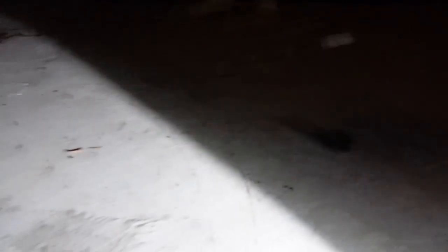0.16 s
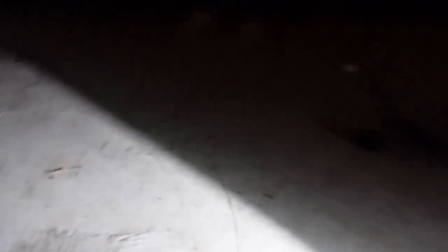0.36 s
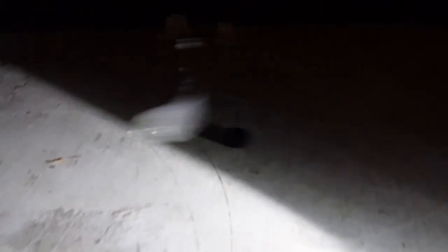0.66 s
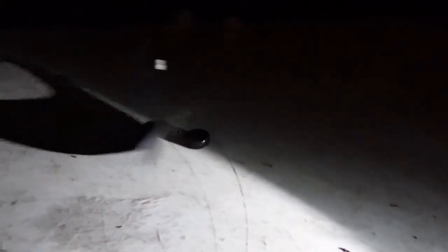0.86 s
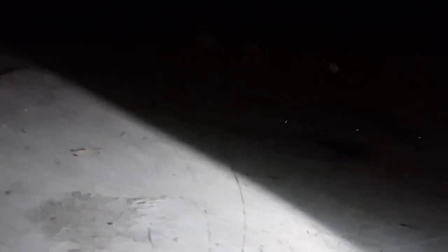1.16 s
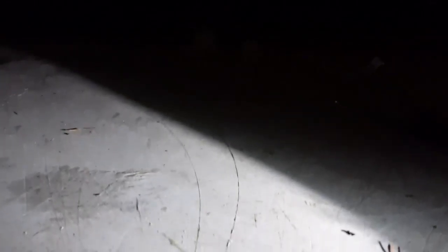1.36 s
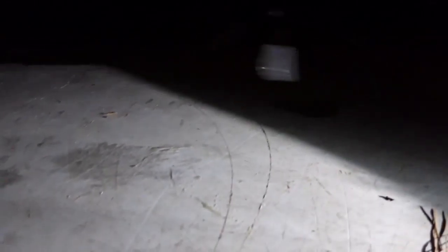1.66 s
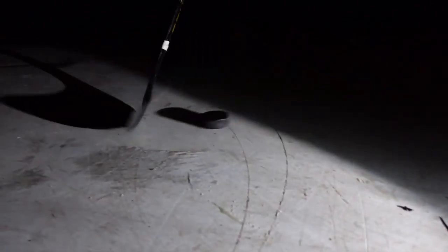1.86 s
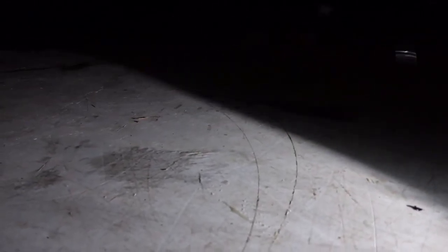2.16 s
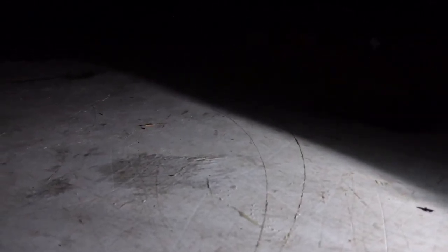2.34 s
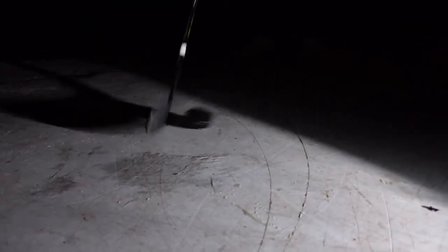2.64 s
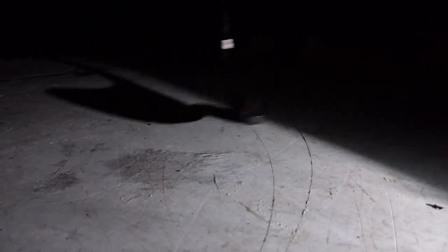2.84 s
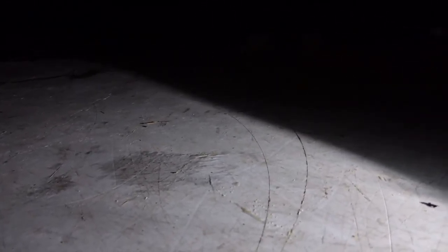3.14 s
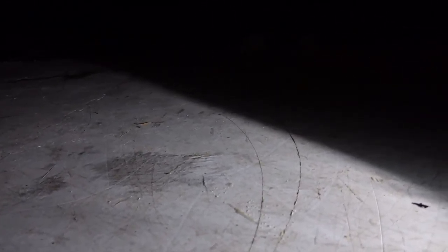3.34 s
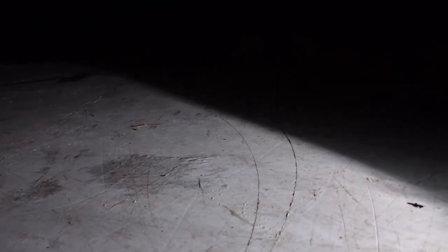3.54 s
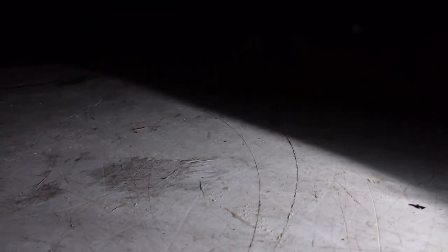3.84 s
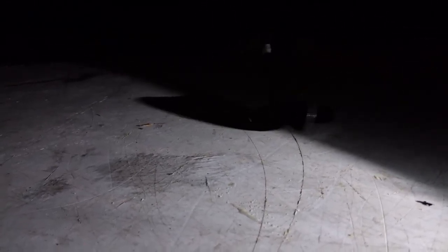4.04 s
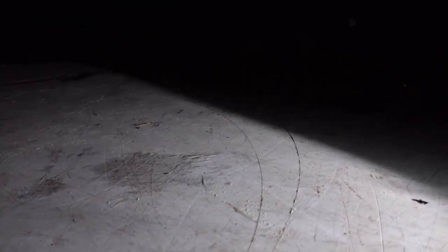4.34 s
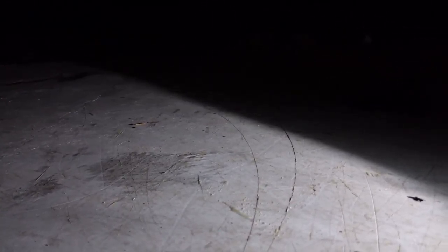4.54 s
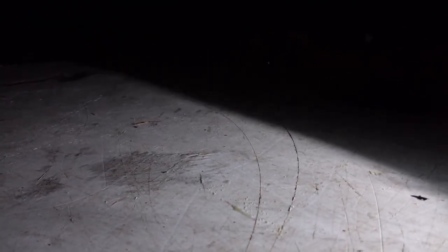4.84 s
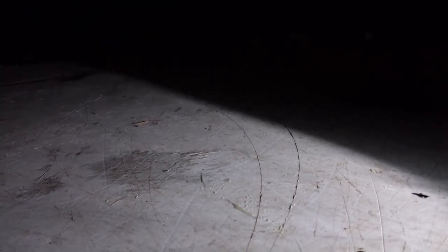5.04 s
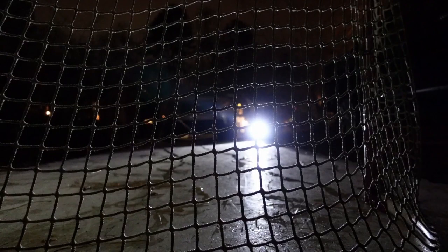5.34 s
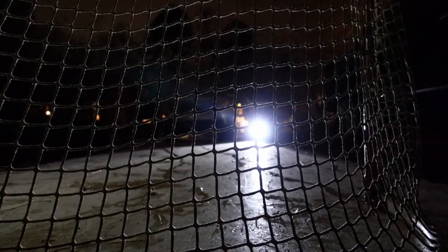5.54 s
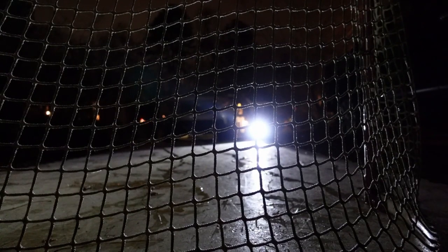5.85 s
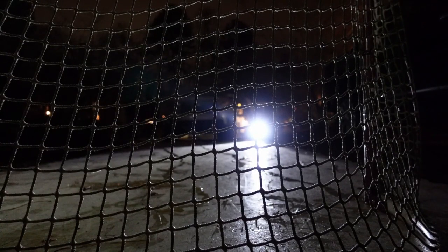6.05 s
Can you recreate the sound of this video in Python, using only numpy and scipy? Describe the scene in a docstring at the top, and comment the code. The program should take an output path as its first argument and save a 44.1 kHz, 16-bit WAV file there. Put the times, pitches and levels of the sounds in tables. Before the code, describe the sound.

A hockey stick batters a hard puck across a gritty slab, loud and dry, then rough handling bumps and quiet far-off taps behind a net.

```python
"""Stick and puck on a concrete slab at night

An outdoor slab, with the microphone almost touching a hockey stick that handles a puck.
Knocks and cracks are damped modes, scrapes are filtered grains, judder and rasp are stick-slip pulses.
Low thumps come from blade blows and, near the end, from rubs on the camera's housing; peaks overload.
Then the play is far off, behind the goal net: taps with weak echoes and a slide over the night hush."""
import sys
import numpy as np
from scipy import signal
from scipy.fft import rfft, irfft, next_fast_len
from scipy.io import wavfile
from scipy.ndimage import uniform_filter1d, map_coordinates

SR = 44100
rng = np.random.default_rng(int(sys.argv[2]) if len(sys.argv) > 2 else 0)


def unload_wav(signal):
    """Save mono or channel-first audio to the path in sys.argv[1] as 16-bit WAV at rate SR, clipped to [-1, 1]."""
    wavfile.write(
        sys.argv[1],
        SR,
        np.round(np.clip(np.atleast_2d(signal).T, -1, 1) * 32767).astype(np.int16),
    )


N = 273419

# Far play behind the net. Each row: start in seconds, level in dB, pitch in Hz.
FAR_TAPS = [(5.5162, -27, 1000), (5.7674, -23, 476), (6.096, -24.5, 916)]
# Swell of the far slide. Each row: time in seconds, level in dB.
FAR_LEVEL = [(5.8, -55.5), (5.92, -44.5), (6.0, -48), (6.09, -29), (6.2, -51)]
# Spectra of the far slide and the night hush. Each row: frequency in Hz, relative level in dB.
FAR_SLIDE = [(25, -0.5), (490, -5.5), (2500, -6), (7000, -34.5), (16000, -45)]
NIGHT = [(25, 5), (280, -13.5), (476, -8), (800, -13), (16000, -35)]

# Rubs on the camera housing. Each row: start in seconds, length in seconds, shell level in dB,
# dulling corner in Hz, grit level in dB.
GRINDS = [(4.584, 0.048, -7.5, 13000, -26.5), (4.651, 0.034, -11, 9000, -44),
          (4.729, 0.047, -10, 5000, -47), (4.776, 0.03, -13.5, 4470, -44),
          (5.044, 0.068, -19.5, 450, -51.5), (5.176, 0.054, -10.5, 2630, -33.5)]
# Knocks of the shell where a rub catches. Each row: start in seconds, peak level in dB.
BUMPS = [(4.5871, 7), (4.643, -4), (4.665, -5.5), (4.709, -1.5), (4.7253, 0), (4.7462, -2), (4.7963, -10),
         (5.095, -17), (5.1745, -5.5)]
# Spectrum of the shell. Each row: frequency in Hz, relative level in dB.
GRIND = [(40, -3), (110, 14), (300, 7), (520, 6), (1100, -2.5), (1450, -9), (1780, 4), (2120, -2.5),
         (2420, -0.5), (3100, -18), (7500, -46.5)]
RUB_RISE_S = 0.00064  # swell of a rub at 0 dB; lighter rubs swell more slowly
SHELL_T60_S = 0.023  # decay of the scattered paths before their spectrum is flattened

# The puck rolls on its edge. Each row: start in seconds, length in seconds, level in dB.
ROLL = [(1.61, 0.38, -49), (2.87, 0.23, -30.5), (3.64, 0.22, -46), (3.93, 0.4, -43)]
# Pushes that send the puck sliding. Each row: start in seconds, length in seconds,
# grit level in dB, tumble level in dB, both ahead of the trims in the slide.
SLIDES = [(0, 0.024, -19.5, -10.5), (0.099, 0.058, -21.5, -16.5), (0.232, 0.29, -34, -27),
          (0.371, 0.12, -23.5, -16.5), (0.614, 0.065, -23.5, -21), (0.721, 0.22, -28.5, -17.5),
          (0.916, 0.067, -21.5, -19.5), (1.042, 0.34, -30.5, -23.5), (1.448, 0.064, -21.5, -18.5),
          (1.594, 0.38, -39.5, -36), (1.943, 0.2, -25.5, -23), (2.304, 0.032, -21.5, -22.5),
          (2.503, 0.24, -23, -16), (2.808, 0.19, -34.5, -21.5), (3.062, 0.15, -30.5, -18),
          (3.257, 0.26, -35, -20.5), (3.635, 0.21, -40, -23.5), (4.029, 0.13, -29, -20),
          (4.193, 0.044, -31.5, -15), (4.315, 0.045, -40.5, -42.5), (4.493, 0.087, -34, -22),
          (4.855, 0.052, -46.5, -33.5)]
# Spectra of grit, tumble and camera rumble. Each row: frequency in Hz, relative level in dB.
GRIT = [(400, -18), (1100, 7.5), (2200, 7), (2900, 4.5), (3800, -2.5), (6500, -13), (16000, -46.5)]
TUMBLE = [(70, -3.5), (160, -1.5), (380, -3), (700, -9), (1300, -17), (3000, -59)]
RUMBLE = [(12, 9.5), (45, 2.5), (90, 2), (160, -9.5), (400, -76.5)]
SLIDE_RISE_S, SLIDE_FALL_DB_PER_S = 0.0019, 176.5  # it slides evenly, then runs out
WAKE_DB, WAKE_FALL_DB_PER_S = -15.5, 96.5  # rumble left by each thump, against that thump
SHAKE_DB = -4  # rumble against the tumble envelope
# Chance ticks of the puck against the blade. Each list: the value over grit, then over tumble;
# first the level in dB against the slide, then the middle pitch in Hz.
RATTLE_DB = [1.5, -3.5]
RATTLE_HZ = [2230, 491]
RATTLE_PER_S = 45  # in each of the two bands
RATTLE_SPREAD_DB, RATTLE_SPREAD_OCTAVES = 11, 0.72  # scatter either way

# The flat blade sweeps the slab. Each row: start in seconds, length in seconds, level in dB.
SWEEPS = [(1.45, 0.14, -24.5), (1.945, 0.24, -18), (2.53, 0.11, -25.5), (5.53, 0.045, -45)]
# Spectrum of a sweep. Each row: frequency in Hz, relative level in dB.
SWEEP = [(400, -33), (1200, -2), (2000, 2), (3000, -4), (6600, -12), (16000, -43)]
# The blade edge rasps. Each row: start in seconds, length in seconds, level in dB,
# first pitch in Hz, last pitch in Hz.
RASPS = [(2.515, 0.063, -14.5, 1630, 1730), (2.559, 0.027, -13, 1470, 1090), (2.589, 0.17, -23, 1270, 1280),
         (2.651, 0.026, -18, 1260, 1190), (3.23, 0.054, -16.5, 1560, 1670), (3.305, 0.21, -20, 1480, 1390)]

# The blade judders, stiffly and softly. Each row: start in seconds, length in seconds, level in dB.
JUDDER = [(3.292, 0.17, -18.5), (3.486, 0.08, -21.5)]
SOFT_JUDDER = [(3.666, 0.14, -16.5)]
# The judder's hardest catches on the concrete. Each row: time in seconds, peak level in dB.
SLIPS = [(3.204, 4), (3.298, 4), (3.3075, 2.5), (3.318, 8), (3.331, -4), (3.344, 0), (3.362, 5.5),
         (3.379, -0.5), (3.3909, 2.5), (3.395, 6), (3.422, 5), (3.4355, 1), (3.4406, 3.5), (3.462, 11),
         (3.486, 6.5), (3.494, 4.5), (3.5101, 2), (3.5167, 3), (3.528, -6.5), (3.551, -0.5), (3.566, 6),
         (3.67, -11), (3.6901, -5), (3.7525, -10), (3.758, -2.5), (3.7695, -3.5), (3.789, -8.5),
         (3.8252, -7)]
# Resonances of the dragged stick, stiff and soft. Each row: middle pitch in Hz, width in Hz, gain in dB.
STIFF = [(510, 91, 15), (880, 170, -1.5), (1396, 64, 13.5), (2110, 200, 7.5)]
SOFT = [(350, 166, 23), (730, 67, 2.5)]
# Their pitch shifts as the blade bends. Each row: time in seconds, factor on the pitch.
BEND = [(3.29, 1.04), (3.47, 0.92), (3.67, 1.11), (3.76, 0.94)]
BEND_WANDER = 0.026  # size of the waver, as a share of the pitch
CATCH_S, CATCH_RING_DB = 0.0002, -6  # time scale of a catch letting go; the ring against its kick
RELAX_S = 3.62  # the grip relaxes and later catches turn soft

# Thin sharp ticks: grit snapping under the blade and, from 4.6 s, catches on the rubbed
# camera housing. Each row: start in seconds, peak level in dB.
TICKS = [(0.332, -17), (0.3514, 4.5), (0.4424, 9.5), (0.819, 1), (1.1159, 0), (1.3713, 3), (1.8045, -14),
         (1.8196, -8), (4.643, 0.5), (4.7269, -5), (4.7455, -2), (4.759, -5)]
# The puck's rim clacks on blade or slab, higher when the contact is briefer.
# Each row: start in seconds, level in dB, pitch in Hz.
CLACKS = [(0.0215, -20.5, 2100), (0.0915, -2.5, 3290), (0.1105, 0, 3260), (0.1365, -3, 1380),
          (0.379, -2.5, 2080), (1.0612, -8.5, 1860), (1.109, -0.5, 1880), (1.147, -7.5, 1040),
          (1.861, -4, 890), (2.8843, -3, 730), (2.9349, -7.5, 680), (2.9665, -10, 1430), (3.127, -1, 2600),
          (3.204, 2, 1490), (3.2223, -3.5, 1740), (4.015, -6, 950), (4.0822, -4.5, 760), (4.129, -1, 790),
          (4.1652, -4, 610), (4.221, -3.5, 1790), (4.233, -8, 1030)]
CLACK_RISE_CYCLES, CLACK_RING_DB, CLACK_RING_T60_S = 0.35, -10, 0.032  # swell and after-ring
CLACK_CHIP_DB = -26  # crunch of grit ahead of its dulling
# Low thumps of blade blows and, from 4.58 s, of the camera housing being handled.
# Each row: start in seconds, level in dB, settled pitch in Hz.
THUMPS = [(0.004, 0.5, 116.5), (0.033, 6, 102), (0.352, 2.5, 97.3), (0.429, 3, 67.7), (0.49, -0.5, 89),
          (0.627, 0.5, 51), (0.741, 4.5, 88), (0.85, -2, 79.6), (0.925, 2.5, 102), (0.959, 2.5, 97.6),
          (0.993, 1, 48.3), (1.059, 0, 91), (1.258, 0, 51), (1.384, -0.5, 56.6), (1.413, 3, 78),
          (1.911, 0, 90), (1.921, 6, 45.8), (2.32, 2.5, 75), (2.483, 0, 83.6), (2.521, -3.5, 62.3),
          (3.136, -7.5, 194), (3.178, -8, 176), (4.271, -10, 78.6), (4.586, -7.5, 128), (4.69, -7, 162),
          (4.718, -2.5, 75), (4.914, -12, 68.5), (4.996, -16.5, 101.5), (5.068, -12, 99), (5.173, -18, 125)]

# Blade meets puck or slab. Each row: start in seconds, crack level in dB, knock level in dB,
# lag of a lighter second touch in seconds (negative is earlier, 0 is none).
# Both levels are ahead of the trims in the stickhandling.
KNOCKS = [(0.0084, -4, -2, 0.019), (0.0766, -3.5, -7, 0.0068), (0.3358, 6.5, 1.5, 0),
          (0.4237, 8.5, 5, 0.0034), (0.502, -3.5, -9, -0.023), (0.5755, -5.5, -10.5, 0),
          (0.7411, -2.5, -0.5, 0.0045), (0.823, 4, 1, -0.0027), (0.84, 2, 1, 0), (0.873, 2.5, -4, 0),
          (0.935, 5, 0.5, -0.0097), (1.005, 3, -3, -0.0082), (1.0997, -2, -6, 0.00097),
          (1.259, 3.5, 0.5, 0.01), (1.4101, 6, -3, 0), (1.505, 0.5, -6.5, 0.014),
          (1.8691, 4.5, -1, -0.0039), (1.8915, -13, -1, 0), (1.9198, 3.5, -10, -0.009),
          (1.9849, 0.5, -16.5, 0.015), (2.067, -4, -28, 0.013), (2.106, 4, -12, 0.013),
          (2.308, 3, -15, 0.0047), (2.485, -11.5, -4, 0.008), (2.7033, -8.5, -5, 0.0022),
          (2.7317, -5, -36, 0.0019), (3.115, 2.5, -7, 0.011), (3.9079, 0, -11, 0.0044), (4.023, 7.5, -2, 0),
          (4.1206, 0.5, -12.5, 0), (4.4997, 1, -12.5, 0.0076)]
TOUCH_CRACK_DB, TOUCH_KNOCK_DB = -3, -2.5  # the lighter touch against the main one
# Ringing of the blade and of the hollow knock. Each row: middle pitch in Hz,
# middle of the scattered relative level in dB, decay by 60 dB in seconds.
BLADE = [(1470, 6.5, 0.023), (1722, -0.5, 0.05), (2328, 17, 0.014), (2800, 11.5, 0.012)]
BODY = [(189, -2, 0.049), (340, 1, 0.044), (510, 4, 0.017), (832, 5, 0.0058)]
# Spectrum of cracks and ticks. Each row: frequency in Hz, relative level in dB.
CRACK = [(300, -0.5), (1400, 2.5), (2700, 1), (4000, -7), (8000, -23), (16000, -39)]

TOP_HZ = 16000  # band limit of the input


def amp(db):
    """Decibels to gain."""
    return 10 ** (np.asarray(db) / 20)


def unit(x):
    """Scaled to rms 1."""
    return x / np.sqrt(np.mean(x ** 2) + 1e-20)


def crest(x):
    """Scaled to peak 1."""
    return x / np.abs(x).max()


def along(points, hz):
    """Values of (Hz, value) points, joined on a log frequency axis."""
    f, v = np.transpose(points)
    return np.interp(np.log(hz + 1), np.log(f + 1), v)


def level(rows):
    """Gain per sample from (s, dB) points, practically silent outside their span."""
    s, db = np.transpose(rows)
    return amp(np.interp(np.arange(N) / SR, s, db, left=-150, right=-150))


def add(track, s, sound):
    """Mix a sound in at time s."""
    part = track[max(0, round(s * SR)):][:len(sound)]
    part += sound[:len(part)]


def colour(x, spectrum):
    """Causal minimum-phase filter with the given spectrum, by folding its cepstrum."""
    m = 2 * next_fast_len(len(x) // 2 + 4096)
    cepstrum = irfft(np.log(amp(along(spectrum, np.fft.rfftfreq(m, 1 / SR)))))
    cepstrum[1:m // 2] *= 2
    cepstrum[m // 2 + 1:] = 0
    return irfft(rfft(x, m) * np.exp(rfft(cepstrum)))[:len(x)]


def dull(x, order, corner_hz):
    """Low-pass, as a soft contact does."""
    return signal.lfilter(*signal.butter(order, corner_hz, fs=SR), x)


def resonate(x, peaks, soft_hz):
    """x through a set of resonances; the soft contact dulls everything above soft_hz."""
    m = next_fast_len(len(x) + SR // 10)
    f = np.fft.rfftfreq(m, 1 / SR)
    response = sum(amp(db) * 1j * f * w / (c * c - f * f + 1j * f * w) for c, w, db in peaks)
    rung = irfft(rfft(x, m) * response, m)[:len(x)]
    return dull(rung, 2, soft_hz)


def noise():
    """White noise of rms about 1."""
    return rng.standard_normal(N)


def wobble(rate):
    """A smooth random curve, rate knots a second."""
    knots = rng.standard_normal(int(N * rate / SR) + 4)
    return map_coordinates(knots, [np.arange(N) * rate / SR])


def grains(rate, spread_db, hiss_db):
    """Random tiny impacts of uneven size, rate a second, over a smooth friction hiss."""
    struck = rng.random(N) < rate / SR
    size = amp(spread_db * np.clip(noise(), -2, 2))
    impacts = struck * size * np.sign(noise())
    return unit(unit(impacts) + amp(hiss_db) * noise())


def stick_slip(rate, scatter, spread_db, hiss_db):
    """One push each time the contact lets go, at an uneven pace and of uneven size, over hiss."""
    pace, size = rng.standard_normal(size=(4000, 2)).T
    at = (np.cumsum(np.exp(scatter * pace)) * SR / rate).astype(int)
    inside = at < N
    pushes = np.bincount(at[inside], amp(spread_db * np.tanh(size[inside])), N)
    return unit(pushes - pushes.mean()) + amp(hiss_db) * noise()


def stroke(start, length, rise_s, sag_db_per_s, fall_db_per_s):
    """Envelope of one movement: a quick rise, a slowly sagging hold, then a fall."""
    out, t = np.zeros(N), np.arange(SR) / SR
    loss_db = sag_db_per_s * t + fall_db_per_s * np.maximum(t - length, 0)
    add(out, start, np.minimum(t / rise_s, 1) * amp(-loss_db))
    return out


def strokes(rows, rise_s, sag_db_per_s, fall_db_per_s):
    """Summed envelopes of (start s, length s, dB) movements."""
    return sum(amp(db) * stroke(s, length, rise_s, sag_db_per_s, fall_db_per_s) for s, length, db in rows)


def night_hush():
    """Steady coloured noise of the night air, louder out by the net."""
    by_net = np.arange(N) / SR > 5.282
    return np.where(by_net, amp(-50.5), amp(-54.5)) * unit(colour(noise(), NIGHT))


def yard(x):
    """Weak, dull scattered echoes of the open yard: a decaying noise tail."""
    t = np.arange(SR // 2) / SR
    tail = dull(rng.standard_normal(len(t)), 1, 5000) * amp(-60 * t / 0.14)
    return signal.fftconvolve(x, tail / np.linalg.norm(tail))[:N]


def far_play():
    """Distant taps with yard echoes, and a swelling slide of filtered noise."""
    taps = clacks(FAR_TAPS)
    gliding = level(FAR_LEVEL) * unit(colour(noise(), FAR_SLIDE))
    return taps + amp(-3.5) * yard(taps) + gliding


def scatter():
    """One push spread over many short paths, all pitches alike before the closing fade."""
    t = np.arange(SR // 25) / SR
    paths = rfft(rng.standard_normal(len(t)) * amp(-60 * t / SHELL_T60_S))
    return irfft(paths / np.abs(paths), len(t)) * (1 - t / t[-1]) ** 2


def housing():
    """Rough rubs slip and catch on the camera's shell, sounding its resonances under a scratch of grit."""
    out = np.zeros(N)
    scratch_band = signal.butter(4, [2300, 4700], "bandpass", fs=SR, output="sos")
    scratch = unit(signal.sosfilt(scratch_band, grains(rate=900, spread_db=4, hiss_db=-6)))
    for s, length, db, dull_hz, grit_db in GRINDS:
        slips = stick_slip(rate=300, scatter=.55, spread_db=5, hiss_db=-9)
        shell = unit(colour(signal.fftconvolve(slips, scatter())[:N], GRIND))
        force = stroke(s, length, rise_s=RUB_RISE_S / amp(2 * db), sag_db_per_s=32, fall_db_per_s=851)
        out += force * (amp(db) * dull(shell, 1, dull_hz) + amp(grit_db) * scratch)
    for s, db in BUMPS:
        add(out, s, amp(db) * crest(colour(scatter(), GRIND)))
    return out


def rolling():
    """The rim of the rolling puck ticks in one high resonance, passed twice."""
    bumps = stick_slip(rate=70, scatter=.45, spread_db=5, hiss_db=-6)
    peak = [(2850, 900, 0)]  # (Hz, width Hz, dB)
    once = resonate(bumps, peak, soft_hz=5000)
    rim = unit(resonate(once, peak, soft_hz=5000))
    return strokes(ROLL, rise_s=0.012, sag_db_per_s=41, fall_db_per_s=249.5) * rim


def patchy(x, depth_db):
    """The point of contact wanders, so each band swells and fades on its own."""
    z = signal.stft(x, nperseg=256)[2]
    across_bands = uniform_filter1d(rng.standard_normal(z.shape), size=9, axis=0)
    field = uniform_filter1d(across_bands, size=4, axis=1)
    return unit(signal.istft(z * amp(depth_db * unit(field)), nperseg=256)[1][:N])


def rattle(gritty, hollow):
    """Small chance clacks, each of its own pitch, their strength following the slide that shakes them out."""
    count, rows = round(RATTLE_PER_S * N / SR), []
    for force, db, hz in zip((gritty, hollow), RATTLE_DB, RATTLE_HZ):
        when, size, pitch = rng.uniform(-1, 1, (count, 3)).T
        # one tick at a random place in each equal slice of time
        at = ((np.arange(count) + .5 + when / 2) * (N - 1) / count).astype(int)
        size_db = 20 * np.log10(force[at] + 1e-9) + db + RATTLE_SPREAD_DB * size
        rows += zip(at / SR, size_db, hz * 2 ** (RATTLE_SPREAD_OCTAVES * pitch))
    return clacks(rows)


def camera_shake(hollow):
    """Slides and thumps shake the camera: low rumble under their envelopes."""
    wake = sum(amp(db + WAKE_DB) * stroke(s, 0, 0.0084, 0, WAKE_FALL_DB_PER_S) for s, db, _ in THUMPS)
    return (wake + amp(SHAKE_DB) * hollow) * unit(colour(noise(), RUMBLE))


def slide():
    """The puck rides over clumped grit grains with a hollow tumble of bumps, a rattle and a shake."""
    pushes = [stroke(s, length, SLIDE_RISE_S, 0, SLIDE_FALL_DB_PER_S) for s, length, _, _ in SLIDES]
    gritty, hollow = amp(np.array(SLIDES)[:, 2:]).T @ np.array(pushes)
    clumps = amp(3.5 * wobble(140))
    grit = patchy(colour(clumps * grains(rate=700, spread_db=4.5, hiss_db=-6), GRIT), depth_db=3.5)
    tumble = unit(colour(grains(rate=300, spread_db=6, hiss_db=-8), TUMBLE))
    ride = amp(-1.5) * gritty * grit + amp(-3.0) * hollow * tumble
    return ride + camera_shake(hollow) + rattle(gritty, hollow)


def sweeps():
    """The flat blade hisses on the slab: dense grains through one broad spectrum."""
    hiss = unit(colour(grains(rate=3000, spread_db=3, hiss_db=-4), SWEEP))
    return strokes(SWEEPS, rise_s=0.0087, sag_db_per_s=28.0, fall_db_per_s=497.5) * hiss


def rasps():
    """Fine slips of the blade's edge excite one gliding resonance."""
    out, t = np.zeros(N), np.arange(SR // 2) / SR
    flutter = [(110, -8.0), (400, -17.5), (1500, -37.5), (5000, -64.5)]  # (Hz off the resonance, dB)
    for s, length, db, first_hz, last_hz in RASPS:
        pitch = np.interp(t, [0, length], [first_hz, last_hz])
        turn = np.exp(2j * np.pi * np.cumsum(pitch) / SR)
        # shifted down to 0 Hz, filtered there, and shifted back to the gliding pitch
        slips = stick_slip(rate=280, scatter=.4, spread_db=4, hiss_db=-7)[:len(t)] / turn
        filtered = colour(slips.real, flutter) + 1j * colour(slips.imag, flutter)
        rung = unit(np.real(turn * filtered))
        press = stroke(0, length, rise_s=0.0079, sag_db_per_s=20.0, fall_db_per_s=503)[:len(t)]
        add(out, s, amp(db) * press * rung)
    return out


def bend(s):
    """Pitch factor of the dragged blade at time s."""
    return np.interp(s, *np.transpose(BEND))


def glide(x, peaks, soft_hz):
    """x through resonances that follow the bend of the blade and waver, dulled above soft_hz."""
    out, factor = np.zeros(N), bend(np.arange(N) / SR)
    for hz, width, db in peaks:
        pitch = hz * factor * (1 + BEND_WANDER * wobble(40))
        turn = np.exp(2j * np.pi * np.cumsum(pitch) / SR)
        pole = np.exp(-np.pi * width / SR)
        out += amp(db) * np.real(turn * signal.lfilter([1 - pole], [1, -pole], x / turn))
    return unit(dull(out, 2, soft_hz))


def catches():
    """Dry catches on the concrete: the blade is held back, flung forward, and rings."""
    out, t = np.zeros(N), np.arange(SR // 20) / SR
    u = t / CATCH_S - np.pi
    kick = crest(u * np.exp(-u * u / 2))
    for s, db in SLIPS:
        peaks = STIFF if s < RELAX_S else SOFT
        # each catch holds the blade at another point and shifts its resonances
        held = [(hz * bend(s) * np.exp(.05 * rng.standard_normal()), width, gain)
                for hz, width, gain in peaks]
        rung = crest(resonate(kick, held, soft_hz=4020))
        add(out, s - CATCH_S, amp(db) * crest(kick + amp(CATCH_RING_DB) * rung))
    return out


def judders():
    """Stick-slip of the dragged blade: catches over a buzzing chatter, stiff until the grip relaxes."""
    chatter = stick_slip(rate=185, scatter=.25, spread_db=4, hiss_db=-7)
    jolts = stick_slip(rate=155, scatter=.2, spread_db=3, hiss_db=-11)
    stiff = strokes(JUDDER, rise_s=0.01, sag_db_per_s=3, fall_db_per_s=904)
    soft = strokes(SOFT_JUDDER, rise_s=0.0071, sag_db_per_s=14, fall_db_per_s=482.5)
    return catches() + stiff * glide(chatter, STIFF, soft_hz=2650) + soft * glide(jolts, SOFT, soft_hz=940)


def ticks():
    """Grit under the blade, or a catch on the camera housing, gives a single thin bright swing."""
    out, t = np.zeros(N), np.arange(SR // 100) / SR
    snap = crest(colour(np.exp(-t / 0.00002) - np.exp(-t / 0.00018) / 10, CRACK))
    for s, db in TICKS:
        add(out, s, amp(db) * snap)
    return out


def clacks(rows):
    """Hard rubber swings only two or three times, with a crunch of grit and a faint after-ring."""
    out, t = np.zeros(N), np.arange(SR // 25) / SR
    for s, db, hz in rows:
        u = hz * t / CLACK_RISE_CYCLES
        swing = u * np.exp(1 - u) + amp(CLACK_RING_DB - 60 * t / CLACK_RING_T60_S)
        chip = dull(rng.standard_normal(len(t)), 1, 3500) * amp(CLACK_CHIP_DB - 60 * t / 0.012)
        add(out, s, amp(db) * (swing * np.sin(2 * np.pi * hz * t) + chip))
    return out


def thumps():
    """Slow swings of a blade blow or of the handled camera housing, sagging in pitch as pressure eases."""
    out, t = np.zeros(N), np.arange(SR // 3) / SR
    for s, db, hz in THUMPS:
        pitch = hz * (1 + .5 * np.exp(-t / 0.0037))
        phase = 2 * np.pi * np.cumsum(pitch) / SR
        add(out, s, amp(db - 60 * t / 0.1) * (1 - np.exp(-t / 0.00029)) * np.sin(phase))
    return out


def ring(modes, t, detune):
    """Damped modes; each point of contact gives them new strengths and slightly new pitches."""
    hz, db, t60 = np.transpose(modes)[:, :, None]
    strength, shift = rng.standard_normal((2, len(hz), 1))
    decay = amp(db + 3.16 * strength - 60 * t / t60)
    swing = np.sign(shift) * np.sin(2 * np.pi * hz * (1 + detune * shift) * t)
    return crest(np.sum(decay * swing, axis=0))


def strikes(rows, crack_db, blade_db, body_db, scuff_db):
    """Each contact is a short crack with a trailing scuff, the swelling ring of the blade and a hollow knock."""
    out, t = np.zeros(N), np.arange(SR // 12) / SR
    attack = 1 - np.exp(-t / 0.0003)
    burst = attack * (amp(-60 * t / 0.01) + amp(scuff_db - 60 * t / 0.062))
    for s, high_db, low_db in rows:
        crack = crest(colour(rng.standard_normal(len(t)) * burst, CRACK))
        blade = crest(attack * ring(BLADE, t, detune=0.0563))
        bright = amp(crack_db) * crack + amp(blade_db) * blade
        knock = attack * ring(BODY, t, detune=0.12)
        add(out, s, amp(high_db) * bright + amp(low_db + body_db) * knock)
    return out


def stickhandling():
    """The blade lands on heel and toe, milliseconds apart, one harder; some landings are single."""
    main = [(s, crack, knock) for s, crack, knock, _ in KNOCKS]
    light = [(s + lag, crack + TOUCH_CRACK_DB, knock + TOUCH_KNOCK_DB)
             for s, crack, knock, lag in KNOCKS if lag]
    return strikes(main + light, crack_db=-1.0, blade_db=-8.5, body_db=6.0, scuff_db=-24.5)


def scene():
    """All the play, far and near, as one channel."""
    background = night_hush() + far_play() + housing()
    puck = rolling() + slide() + clacks(CLACKS)
    blade = sweeps() + rasps() + judders() + stickhandling()
    blade_and_housing = ticks() + thumps()
    return (background + puck + blade + blade_and_housing)[None]


def record(dry):
    """The input overloads; bass coupling tilts the flat tops; a band limit closes the treble."""
    overloaded = dry / (1 + np.abs(dry / .9) ** 10) ** (1 / 10)
    coupled = signal.lfilter(*signal.butter(1, 18, "highpass", fs=SR), overloaded)
    m = next_fast_len(N + SR // 2)
    passed = np.fft.rfftfreq(m, 1 / SR) < TOP_HZ
    return irfft(rfft(np.clip(coupled, -1, 1), m) * passed, m)[..., :N]


dry = scene()
out = record(dry)
unload_wav(out)
```